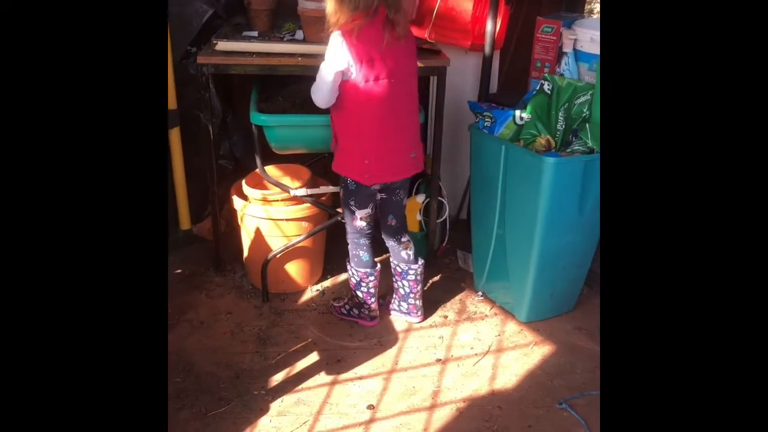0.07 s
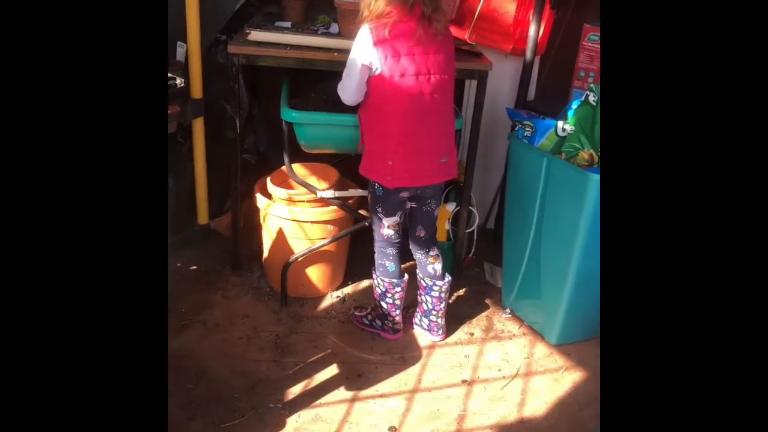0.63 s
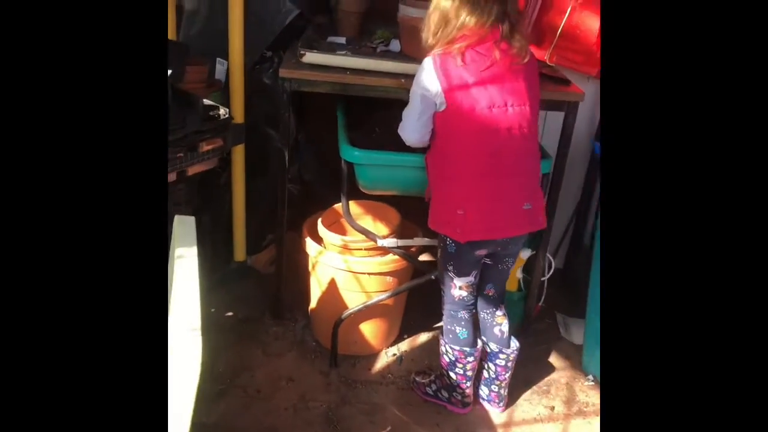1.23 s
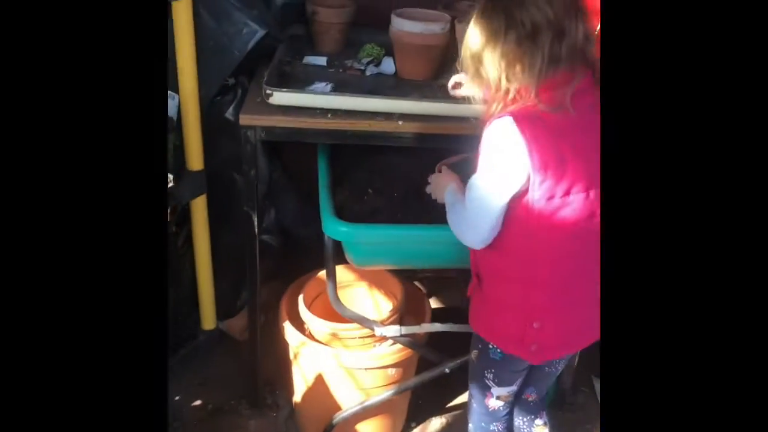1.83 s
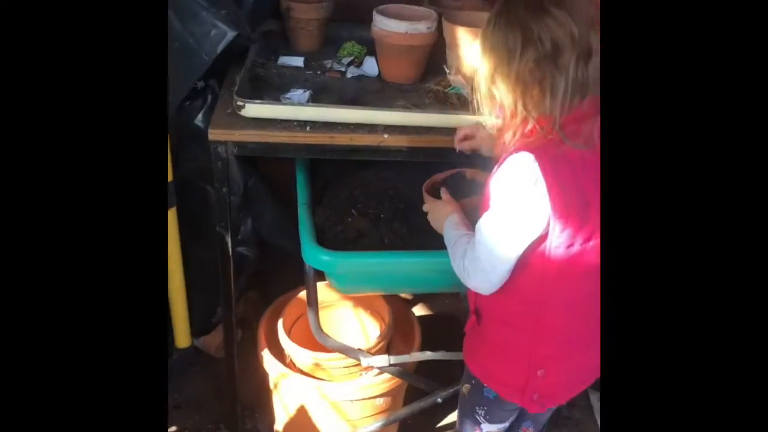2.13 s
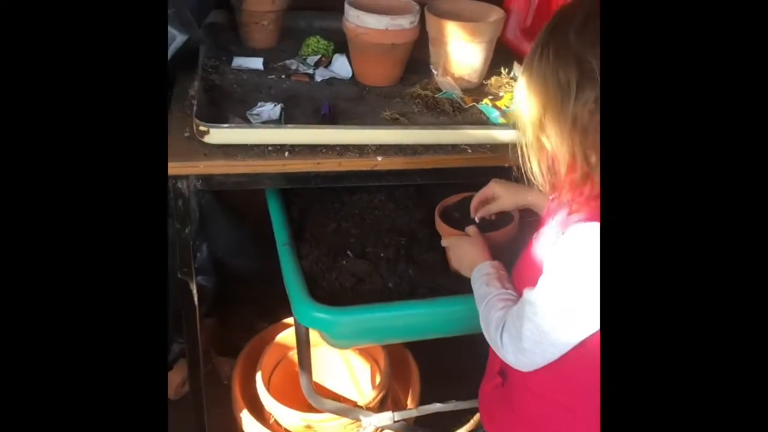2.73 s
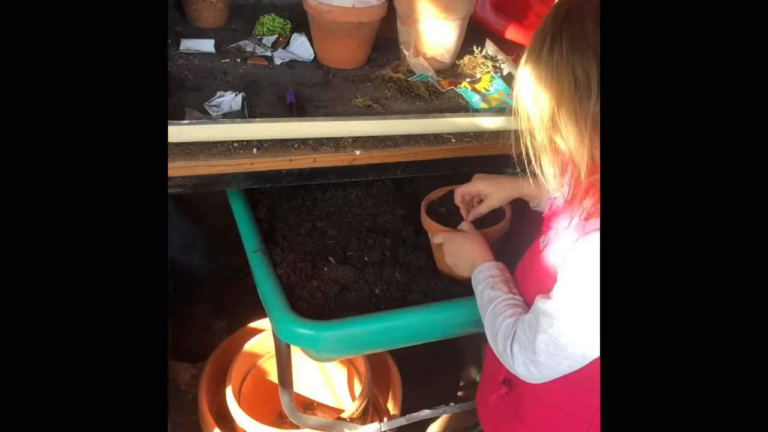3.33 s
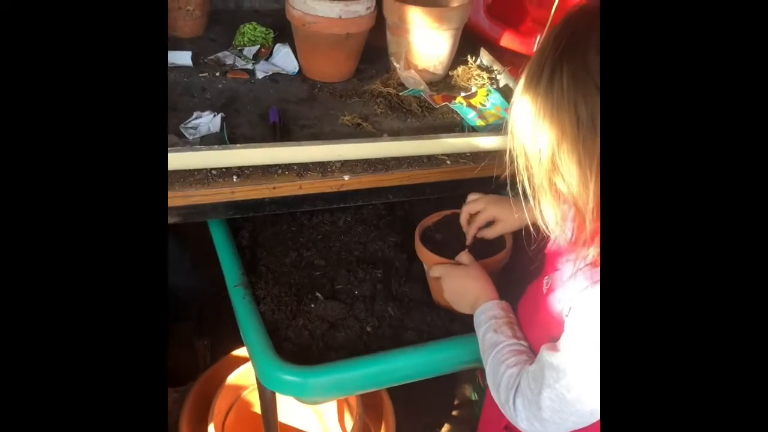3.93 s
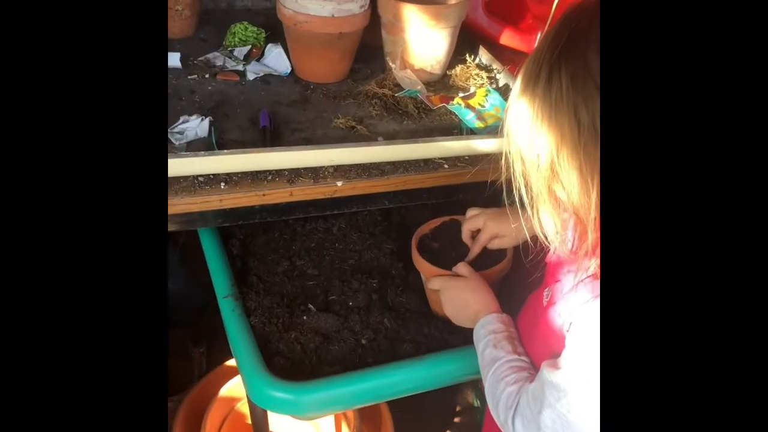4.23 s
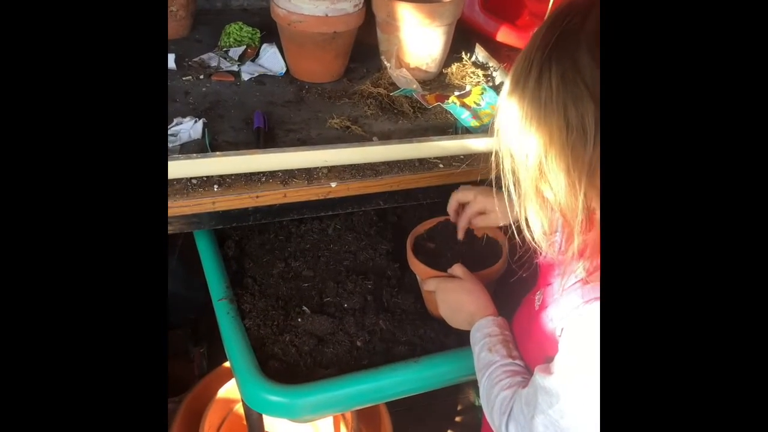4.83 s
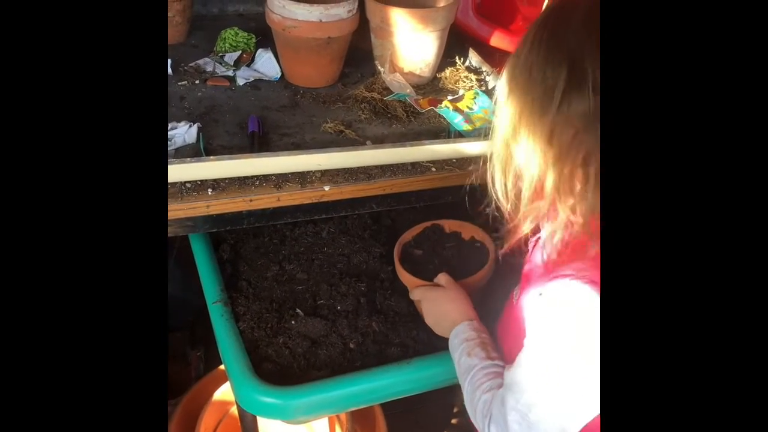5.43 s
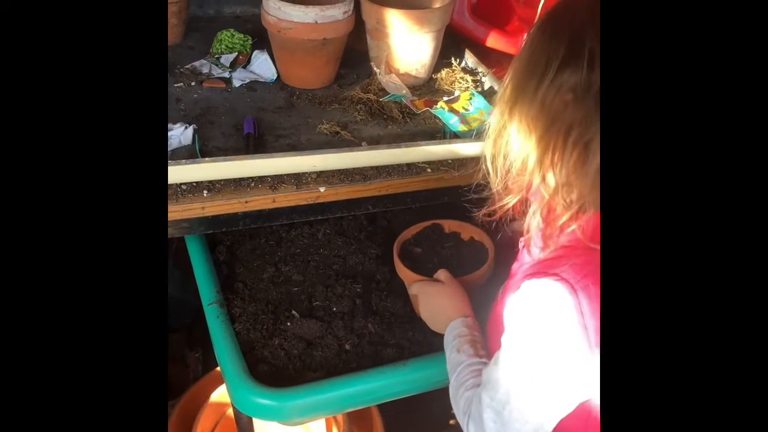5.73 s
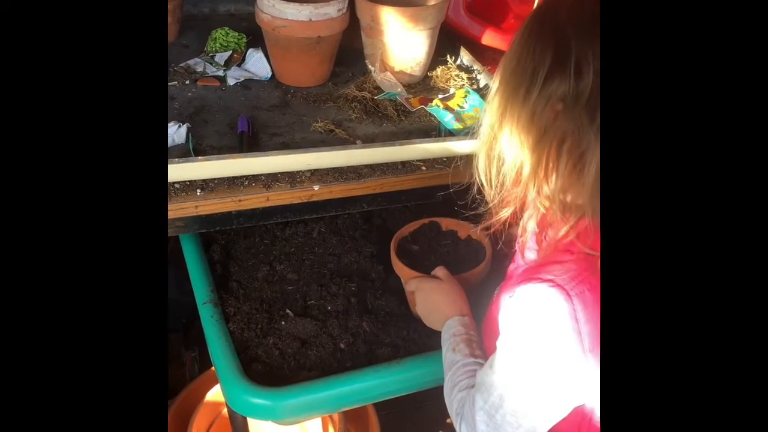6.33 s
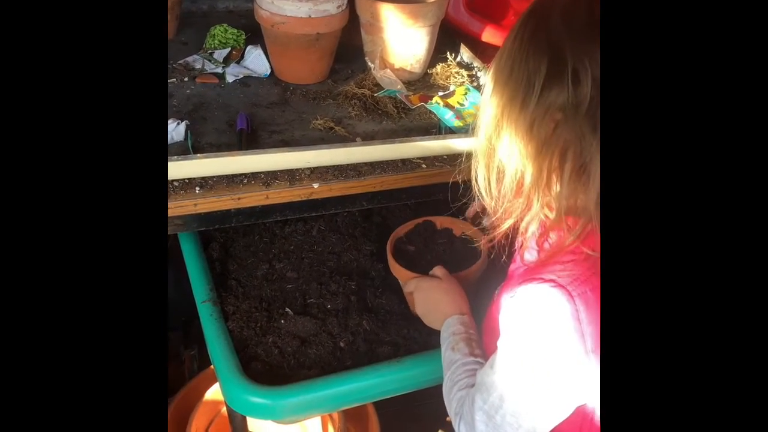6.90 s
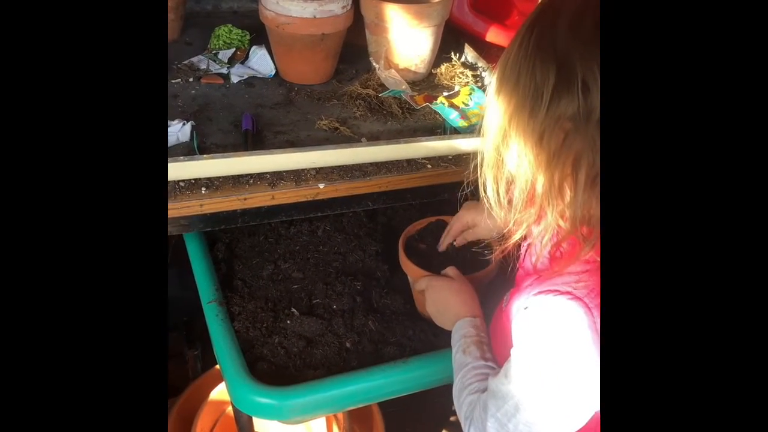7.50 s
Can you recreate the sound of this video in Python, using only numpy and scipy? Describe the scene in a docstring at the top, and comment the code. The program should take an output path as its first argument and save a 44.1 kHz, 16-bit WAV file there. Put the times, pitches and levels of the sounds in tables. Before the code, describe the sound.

Footsteps thud on creaky shed boards with one hard knock, then a clay pot ticks softly while faint birds sing outside.

```python
"""A child pots up soil in a wooden shed while someone steps closer over the boards.
Grit crunches and a padded vest swishes; from 1 s the boards thud and creak, with one hard knock at 1.4 s.
The clay pot ticks, and the soil tub takes three hollow bumps between 2.4 and 2.9 s.
The steps fade. Outside, scattered bird calls give way at 5.1 s to a song: thin notes, trill, flourish.
A faint, far rumble runs underneath."""
import sys
import numpy as np
from scipy import signal
from scipy.fft import rfft, irfft
from scipy.io import wavfile

SR = 44100
rng = np.random.default_rng(int(sys.argv[2]) if len(sys.argv) > 2 else 0)


def int16_out(signal):
    """Quantize to a 16-bit WAV file."""
    q = np.round(np.clip(np.atleast_2d(signal).T, -1, 1) * 32767)
    wavfile.write(sys.argv[1], SR, q.astype(np.int16))


N = 337806
TIME = np.arange(N) / SR


# Hard knocks. Each row: start in seconds, level in dB, treble corner in Hz, grit scuff in dB.
KNOCKS = [(0.991, -53, 1300, -66.5), (1.4474, -21, 1600, -62.5), (3.3, -61, 1800, -72.5)]
# Soft treads. Each row: start in seconds, level in dB, treble corner in Hz, grit scuff in dB.
STEPS = [(.01, -48.5, 700, -73), (1.168, -44, 1100, -64), (1.605, -43.5, 220, -91),
         (2.046, -31.5, 180, -62), (3.534, -40.5, 207, -66), (3.97, -53, 1200, -72),
         (5.112, -54, 600, -77.5)]
def blows(knock_rise_s=0.00048, bounce_s=0.0178, bounce_db=-1.5, step_rise_s=0.0096, toe_s=0.071):
    """Board contacts as (s, dB, corner Hz, rise s, rings): knocks rebound, steps land heel then toe."""
    for s, db, corner_hz, _ in KNOCKS:
        for k in range(3):
            yield s, db + k * bounce_db, corner_hz * (0.45 if k else 1), knock_rise_s, k == 0
            s += bounce_s * 0.77 ** k
    for s, db, corner_hz, _ in STEPS:
        yield s, db, corner_hz, step_rise_s, True
        yield s + toe_s, db - 9.5, corner_hz, step_rise_s, True


# Board modes. Each row: frequency in Hz, level in dB, T60 in seconds.
BOARD_MODES = [(173.8, 0.5, 0.47), (205.2, 2, 0.31), (266.2, 4.5, 0.19), (324, 5, 0.21), (364, 2.5, 0.16),
               (507.3, 1.5, 0.18), (555, -4, 0.2), (736, -7, 0.16), (810.6, -0.5, 0.2), (1025, -14, 0.27)]
def board_ring(lag_at_100hz_s=0.0033):
    """Bending waves in the boards: low modes travel slowest and arrive last."""
    ring = 0
    for hz, db, t60_s in BOARD_MODES:
        t = np.maximum(TIME[:SR // 2] - lag_at_100hz_s * np.sqrt(100 / hz), 0)
        ring = ring + amp(db - 60 * t / t60_s) * np.sin(2 * np.pi * hz * t)
    return ring


# Dense, short-lived part of a thud. Each row: frequency in Hz, relative density in dB.
THUD_SPECTRUM = [(50, -48.5), (100, -4), (200, 3), (330, 0.5), (650, -5), (1030, -9.5), (1350, -27),
                 (2200, -26.5), (5000, -40)]
def thuds(ring_db=-7.0, body_db=-3.5, push_db=25, sudden_s=0.0067, scatter_t60_s=0.24):
    """Blows push air, rattle and ring the boards. Rebounds do not ring; slow contacts lose the push."""
    out, t = np.zeros(N), TIME[:SR // 2]
    ring, push = board_ring(), pulse(THUD_SPECTRUM)
    for s, db, corner_hz, rise_s, rings in blows():
        scatter = rng.standard_normal(len(t)) * amp(-60 * t / scatter_t60_s)
        body = signal.fftconvolve(scatter, push)[:len(t)]
        blow = (rings * amp(ring_db) * ring + amp(body_db) * body) * (1 - np.exp(-t / rise_s))
        blow += amp(push_db) * np.exp(-rise_s / sudden_s) * push
        add(out, s, amp(db) * signal.lfilter(*signal.butter(2, corner_hz, fs=SR), blow))
    bass_cut = signal.butter(2, 105, "high", fs=SR, output="sos")  # thin boards radiate little deep bass
    return signal.sosfilt(bass_cut, out)


# Plastic tub modes. Each row: frequency in Hz, level in dB, T60 in seconds.
TUB_MODES = [(152.3, 4, 0.14), (346, -2, 0.21), (422.4, -5.5, 0.2), (652, -6, 0.16), (723, -7, 0.15)]
# Bumps on the tub. Each row: start in seconds, level in dB, pitch ratio, rise in seconds.
BUMPS = [(2.441, -38, 1, .004), (2.662, -43, .96, .013), (2.83, -44.5, 1.54, .012)]
def tub_bumps(thump_hz=330, thump_db=-1, thump_t60_s=0.19):
    """The tub rings over the thump of its soil. The spot struck sets pitch; slower contact is duller."""
    out, t = np.zeros(N), TIME[:SR // 2]
    for s, level_db, ratio, rise_s in BUMPS:
        ring = sum(amp(db - 60 * t / t60_s) * np.sin(2 * np.pi * ratio * hz * t)
                   for hz, db, t60_s in TUB_MODES)
        soil = unit(hump(rng.standard_normal(len(t)), thump_hz, spread=2.1))
        thump = soil * amp(thump_db - 60 * t / thump_t60_s)
        softened = signal.lfilter(*signal.butter(1, 6 / rise_s, fs=SR), ring + thump)
        add(out, s, amp(level_db) * softened * (1 - np.exp(-t / rise_s)))
    return out


# Soil and sleeve friction between footfalls. Each row: time in seconds, level in dB.
RUBBING_LEVEL = [(0.0, -60), (0.2, -74), (0.45, -72), (2.05, -69.5), (2.22, -76.5), (2.41, -70),
                 (2.46, -63), (2.62, -66), (2.86, -72.5), (3.3, -77.5), (3.5, -68.5), (3.69, -77),
                 (4.31, -84.5), (5.61, -82.5), (5.82, -78.5), (6.23, -85), (7.66, -81.5)]
def friction_db(trim_db=1.5, scuff_rise_s=0.0015, scuff_hold_s=0.081, scuff_t60_s=0.36):
    """Level of continuous rubbing plus a grit scuff under each knock and step."""
    power = amp(np.interp(TIME, *np.transpose(RUBBING_LEVEL)) + trim_db) ** 2
    for s, _, _, db in KNOCKS + STEPS:
        attack = np.clip((TIME - s) / scuff_rise_s, 0, 1)
        release_db = -60 * np.maximum(TIME - s - scuff_hold_s, 0) / scuff_t60_s
        power += (attack * amp(db + release_db)) ** 2
    return 10 * np.log10(power)


# Crushed crumbs. Each row: frequency in Hz, relative density in dB.
CRUNCH_SPECTRUM = [(40, -61), (130, 3), (280, -1), (700, 3), (1300, -6), (2500, -8.5), (4500, -18),
                   (8000, -37), (15000, -66)]
# Fine dust and cloth. Each row: frequency in Hz, relative density in dB.
FIZZ_SPECTRUM = [(1500, -2), (3500, 6.5), (6000, 3), (9000, 0), (12000, -3.5), (15500, -3.5)]
def rubbing(crunch_db=4, fizz_db=-1.5):
    """Crumbs crush in clumps; dust and cloth fizz above them."""
    clumps_db = 3.5 * drift(rate_hz=40)
    crumbs, dust = grains(per_s=3200, spread_db=2.6), grains(per_s=6000, spread_db=1.8)
    crunch = colour(crumbs, CRUNCH_SPECTRUM) * amp(crunch_db + clumps_db)
    fizz = colour(dust, FIZZ_SPECTRUM) * amp(fizz_db + clumps_db / 2)
    return (crunch + fizz) * amp(friction_db())


# Vest strokes. Each row: start in seconds, length in seconds, level in dB, brightest frequency in Hz.
SWISHES = [(0.426, 0.12, -52.5, 5700), (0.598, 0.22, -63, 9000), (1.356, 0.37, -65, 8950),
           (1.695, 0.14, -64.5, 6200), (1.932, 0.08, -63.5, 7000), (4.993, 0.42, -75, 5940)]
def vest_swishes(spread=3.14, top_ratio=1.72):
    """Nylon threads slip over each other; each stroke builds and eases off."""
    out, threads = np.zeros(N), grains(per_s=16000, spread_db=1.6)
    for s, length_s, db, hz in SWISHES:
        stroke = abs(np.sin(np.pi * np.clip((TIME - s) / length_s, 0, 1))) ** 1.3
        hiss = hump(hump(threads, hz, spread), hz, spread)
        lowpass = signal.butter(4, top_ratio * hz, fs=SR, output="sos")
        out += amp(db) * stroke * unit(signal.sosfilt(lowpass, hiss))
    return out


# Pot and stone contacts. Each row: start in seconds, level in dB, brightest frequency in Hz.
TICKS = [(1.4497, -53, 2100), (2.043, -48, 1500), (2.129, -52.5, 4430), (2.44, -46.5, 2400),
         (2.458, -47, 2950), (2.626, -55.5, 4000), (3.116, -60, 5600), (3.3003, -48, 1890),
         (4.091, -55, 4000)]
def pot_ticks(crack_s=0.00031, crack_db=11, tail_t60_s=0.076, trim_db=-2.5):
    """A sharp crack, then quick scatter from bench and walls."""
    out, t = np.zeros(N), TIME[:SR // 4]
    envelope = amp(crack_db) * np.exp(-t / crack_s) + amp(-60 * t / tail_t60_s)
    for s, db, hz in TICKS:
        noise = unit(hump(rng.standard_normal(len(t)), hz, spread=1.54))
        add(out, s, amp(db) * envelope * noise)
    return amp(trim_db) * out


# Creaks. Each row: start in seconds, length in seconds, top pitch in Hz, sag as a fraction, level in dB.
CREAKS = [(1.048, 0.049, 720, 0.027, -55.5), (2.038, 0.11, 609, 0.325, -58.5)]
def board_creaks(roughness=0.024):
    """A board slips underfoot: pitch rises with load and sags as it eases."""
    out = np.zeros(N)
    for s, length_s, top_hz, sag, db in CREAKS:
        u = np.linspace(0, 1, int(length_s * SR))
        load = np.sin(np.pi * u ** 0.8)
        jitter = roughness * drift(top_hz / 2)[:len(u)]
        hz = top_hz * (1 - sag * (1 - load)) * (1 + jitter)
        tone = np.sin(2 * np.pi * np.cumsum(hz) / SR)
        add(out, s, amp(db) * unit(tone * signal.windows.tukey(len(u), 0.5)))
    return out


def whistle(length_s, first_hz, last_hz, waver=0.013, fade_db=-5):
    """One gliding, fading bird note; a wider glide is rougher."""
    u = np.linspace(0, 1, int(length_s * SR))
    jitter = colour(rng.standard_normal(SR // 2), [(330, 0), (660, -60)])[:len(u)]
    depth = waver + 0.08 * abs(np.log(last_hz / first_hz))
    hz = (first_hz + (last_hz - first_hz) * u) * (1 + depth * jitter)
    tone = np.sin(2 * np.pi * np.cumsum(hz) / SR)
    return unit(tone * signal.windows.tukey(len(u), 0.4) * amp(fade_db * u))


# Bird notes. Each row: start in seconds, length in seconds, first and last pitch in Hz, level in dB.
CLEAR_NOTES = [(1.721, 0.073, 4080, 4300, -62), (1.774, 0.071, 3040, 2966, -62.5),
               (2.079, 0.092, 2920, 2864, -61), (2.187, 0.1, 3000, 3090, -62.5),
               (2.355, 0.059, 6180, 6300, -65.5), (2.665, 0.113, 3370, 3140, -61.5),
               (3.059, 0.038, 4750, 4120, -64), (3.084, 0.06, 4130, 4104, -58.5),
               (3.138, 0.042, 3630, 3590, -56.5), (4.752, 0.17, 3640, 3720, -76),
               (4.742, 0.32, 3890, 4120, -79), (6.6, 0.06, 3800, 3010, -55.5),
               (6.756, 0.046, 4164, 3296, -54), (6.832, 0.02, 3260, 3590, -54.5),
               (6.924, 0.065, 3350, 3320, -52), (6.979, 0.055, 3364, 3780, -55),
               (7.08, 0.065, 3230, 2910, -64), (7.129, 0.045, 3750, 4900, -60),
               (7.172, 0.049, 3620, 2920, -55), (7.274, 0.052, 2390, 2577, -57),
               (7.314, 0.052, 3190, 2390, -55.5), (7.384, 0.042, 3230, 3910, -58),
               (7.52, 0.05, 3440, 3690, -55.5), (7.546, 0.059, 3360, 2570, -56.5),
               (7.607, 0.067, 3540, 5130, -58.5)]
def clear_notes():
    """Held or slurred whistles, scattered at first, then bunched in the closing flourish."""
    song = np.zeros(N)
    for s, length_s, first_hz, last_hz, db in CLEAR_NOTES:
        add(song, s, amp(db) * whistle(length_s, first_hz, last_hz))
    return song


def song_opening(start_s=5.108, period_s=0.138, note_s=0.105, first_hz=8640, last_hz=7400):
    """Three thin falling notes, each louder, over a faint, hoarse lower voice."""
    song, low_ratio = np.zeros(N), 0.68
    for k in range(3):
        high = whistle(note_s, first_hz, last_hz, waver=0.0018)
        low = whistle(note_s, low_ratio * first_hz, low_ratio * last_hz, waver=0.044)
        add(song, start_s + k * period_s, amp(-67 + 1.5 * k) * (high + amp(-11) * low))
    return song


# Two-voice trill. Each row: start in seconds, upper voice in dB, lower voice in dB.
TRILL = [(5.524, -64, -73), (5.609, -69, -66.5), (5.695, -67.5, -63), (5.79, -60.5, -70),
         (5.875, -63.5, -64), (5.955, -64, -68), (6.055, -69, -70), (6.133, -61, -72), (6.198, -64.5, -66),
         (6.289, -63, -66), (6.37, -69, -68), (6.478, -63, -72)]
def trill(first_hz=4610, settled_hz=3800, low_hz=3460, settle_s=0.3, first_note_s=0.091, note_s=0.0311):
    """The upper voice starts hoarse, then sinks and parts into short notes; the lower keeps its pitch."""
    song, glide_ratio = np.zeros(N), 1.09
    for s, upper_db, lower_db in TRILL:
        early = np.exp(-(s - TRILL[0][0]) / settle_s)
        hz = settled_hz + (first_hz - settled_hz) * early
        length_s = note_s + (first_note_s - note_s) * early
        upper = whistle(length_s, hz, hz * glide_ratio ** (1 - 2 * early), waver=0.016 + 0.034 * early)
        add(song, s, amp(upper_db) * upper)
        add(song, s, amp(lower_db) * whistle(note_s, low_hz, low_hz * glide_ratio))
    return song


# Far birds. Each row: start in seconds, length in seconds, first and last pitch in Hz, level in dB.
FAR_CALLS = [(.005, 0.1, 3430, 3190, -58), (0.275, 0.077, 1650, 1676, -63),
             (0.554, 0.22, 2420, 2400, -64.5), (2.844, 0.12, 2710, 2930, -64.5),
             (3.99, 0.039, 3650, 3120, -62.5), (4.469, 0.155, 3090, 3330, -73),
             (4.587, 0.11, 3290, 2660, -74), (5.93, 0.041, 2374, 2500, -65),
             (6.664, 0.084, 4370, 4530, -65), (7.02, .025, 4970, 5100, -65), (7.475, 0.02, 6490, 6280, -63)]
def far_calls():
    """Whistles made hoarse by strong pitch jitter."""
    song = np.zeros(N)
    for s, length_s, first_hz, last_hz, db in FAR_CALLS:
        add(song, s, amp(db) * whistle(length_s, first_hz, last_hz, waver=0.044))
    return song


# Yard reverberation. Each row: frequency in Hz, T60 in seconds.
YARD_DECAY = [(2000, 0.4), (9000, 0.5)]
def birds(yard_db=-3.5, direct_db=-4.0):
    """Birds in the yard. Opening and trill arrive mostly by reflection, far calls only so."""
    clear, lead_in = clear_notes(), song_opening() + trill()
    direct = clear + amp(-4.5) * lead_in
    reflected = echoes(clear + lead_in + far_calls(), YARD_DECAY)
    return amp(direct_db) * direct + amp(yard_db) * reflected


# Shed reverberation. Each row: frequency in Hz, T60 in seconds.
SHED_DECAY = [(150, 1), (400, 0.11), (1000, 0.21), (4000, 0.34), (12000, 0.19)]
def shed(x, crossfade_hz=0.299):
    """Wall reflections, shifting between two patterns as the hands move about."""
    turn = 2 * np.pi * crossfade_hz * TIME
    return echoes(x * np.cos(turn), SHED_DECAY) + echoes(x * np.sin(turn), SHED_DECAY)


# Still air. Each row: frequency in Hz, relative density in dB.
AIR_SPECTRUM = [(25, -18), (60, -2), (130, -2.5), (220, -9), (600, -13), (1900, -25.5), (3500, -26),
                (5000, -28), (15500, -37)]
# Swell of the far rumble. Each row: time in seconds, level in dB.
RUMBLE_LEVEL = [(0.0, -59), (0.25, -55), (0.8, -63.5), (2.45, -74.5), (2.65, -56.5), (3.25, -82),
                (3.69, -70), (4.6, -62.5), (5.08, -72.5), (6.3, -68.5), (6.95, -57.5), (7.53, -57.5),
                (7.66, -73)]
# Colour of the far rumble. Each row: frequency in Hz, relative density in dB.
RUMBLE_SPECTRUM = [(25, -28.5), (45, -7), (80, -6), (93, 4), (106, -11), (140, -8.5), (250, -26.5),
                   (1000, -85)]
def outdoors(air_db=-66.5, rumble_trim_db=1.5):
    """Still air and a far, slowly swelling rumble."""
    air = amp(air_db) * colour(rng.standard_normal(N), AIR_SPECTRUM)
    swell_db = np.interp(TIME, *np.transpose(RUMBLE_LEVEL)) + rumble_trim_db
    return air + amp(swell_db) * colour(rng.standard_normal(N), RUMBLE_SPECTRUM)


def amp(db):
    """Decibels to gain."""
    return 10 ** (np.asarray(db) / 20)


def unit(x):
    """Scales to unit rms."""
    return x / np.sqrt(np.mean(x ** 2) + 1e-20)


def lookup(points, hz):
    """Interpolates a table on a log-frequency axis."""
    table_hz, value = np.transpose(points)
    return np.interp(np.log(hz + 1), np.log(table_hz), value)


def add(mix, s, sound):
    """Mixes a sound in at s seconds."""
    part = mix[round(s * SR):][:len(sound)]
    part += sound[:len(part)]


def colour(x, spectrum):
    """Filters x by a spectrum; unit rms."""
    gain = amp(lookup(spectrum, np.fft.rfftfreq(len(x), 1 / SR)))
    return unit(irfft(rfft(x) * gain, len(x)))


def hump(x, hz, spread):
    """Broad resonance around hz."""
    edges_hz = [hz / spread, min(hz * spread, 0.48 * SR)]
    return signal.sosfilt(signal.butter(1, edges_hz, "band", fs=SR, output="sos"), x)


def drift(rate_hz):
    """Smooth random wander; unit rms."""
    return colour(rng.standard_normal(N), [(rate_hz, 0), (2 * rate_hz, -100)])


def grains(per_s, spread_db):
    """Random clicks of uneven size; unit rms."""
    size = amp(spread_db * np.minimum(rng.exponential(1, N), 5))
    return unit(rng.standard_normal(N) * size * (rng.random(N) < per_s / SR))


def pulse(spectrum):
    """Minimum-phase pulse with a given spectrum; unit energy."""
    n = SR // 2
    gain = amp(lookup(spectrum, np.fft.rfftfreq(n, 1 / SR)))
    cepstrum = irfft(np.log(gain), n)
    causal_fold = np.sign(n / 2 - np.arange(n)) + (np.arange(n) > 0)
    shape = irfft(np.exp(rfft(cepstrum * causal_fold)), n)
    return shape / np.linalg.norm(shape)


def echoes(x, decay, per_s=2500, predelay_s=0.003):
    """Sparse reflections, each band dying at its own rate; unit-energy response."""
    n = SR // 2
    taps = rng.choice([-1, 1], n) * (rng.random(n) < per_s / SR) * (TIME[:n] > predelay_s)
    hz, t, bands = signal.stft(taps, SR, nperseg=256)
    fade = amp(-60 * t / lookup(decay, hz)[:, None])
    tail = signal.istft(bands * fade, SR, nperseg=256)[1][:n]
    return signal.fftconvolve(x, tail / np.linalg.norm(tail))[:N]


def scene():
    """Handling and footsteps in the shed, the yard beyond; mono."""
    near = rubbing() + vest_swishes() + pot_ticks() + board_creaks()
    return (near + amp(-2.0) * shed(near) + thuds() + tub_bumps() + birds() + outdoors())[None]


def record(dry, edge_hz=15750):
    """Steep low-pass band limit."""
    lowpass = signal.firwin(511, edge_hz, window=("kaiser", 9), fs=SR)
    return signal.oaconvolve(dry, lowpass[None], "same")


dry = scene()
out = record(dry)
int16_out(out)
```